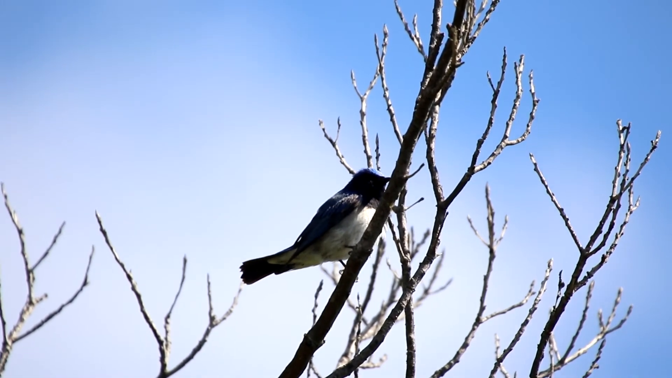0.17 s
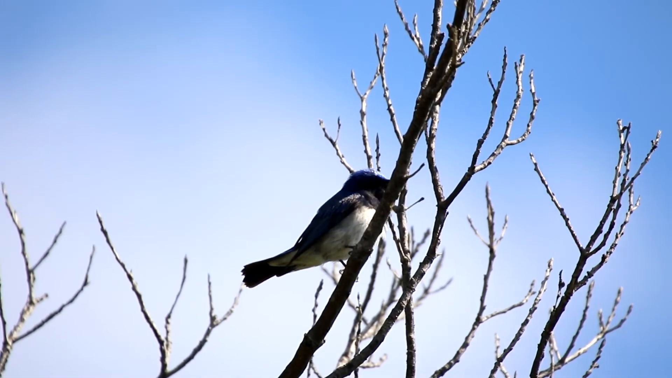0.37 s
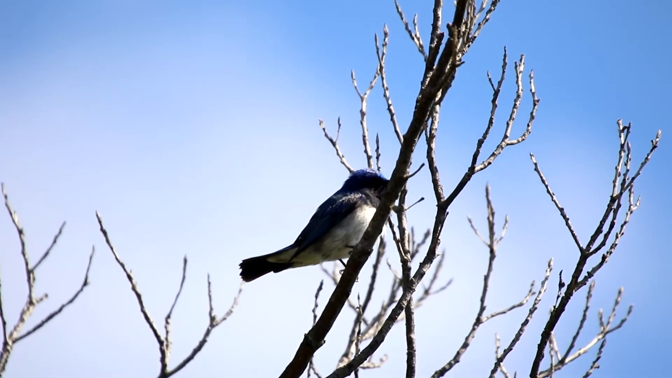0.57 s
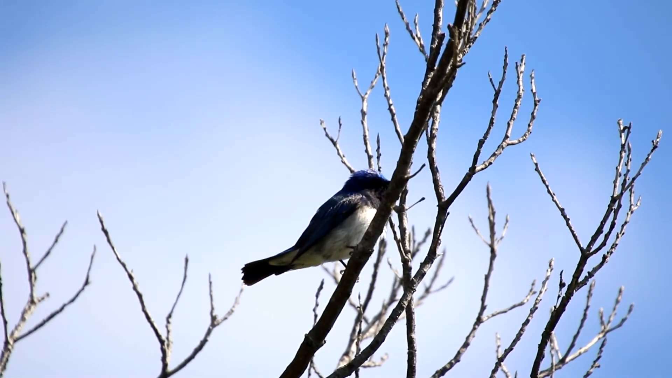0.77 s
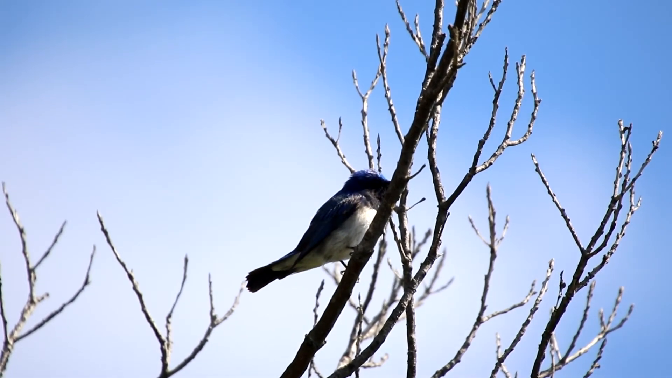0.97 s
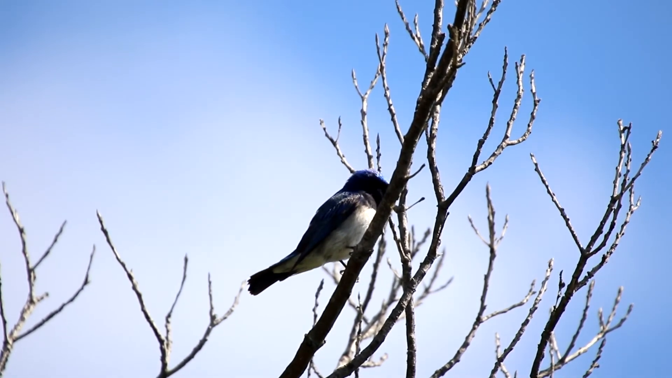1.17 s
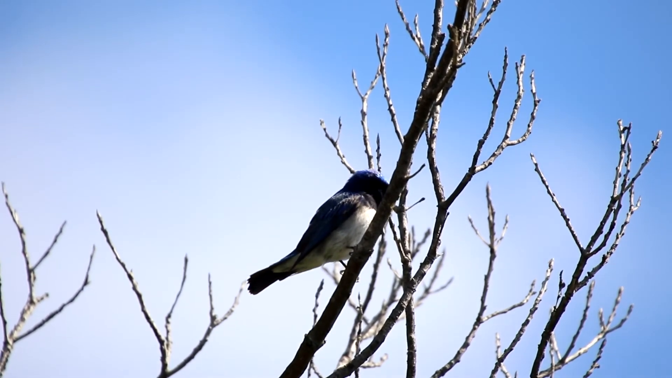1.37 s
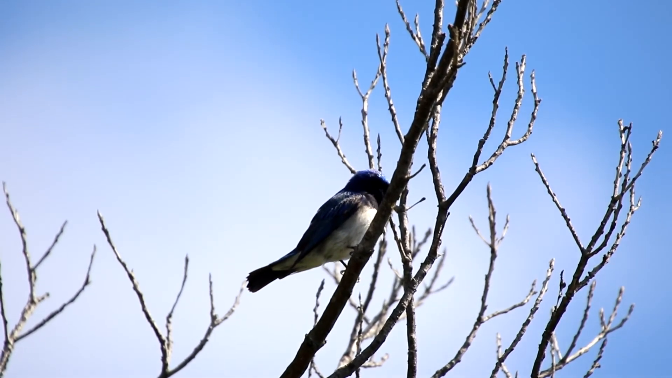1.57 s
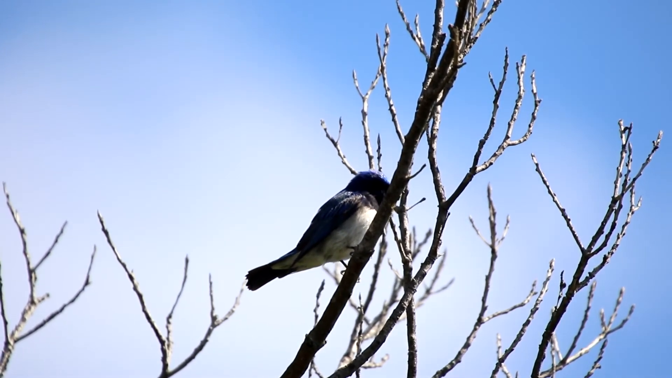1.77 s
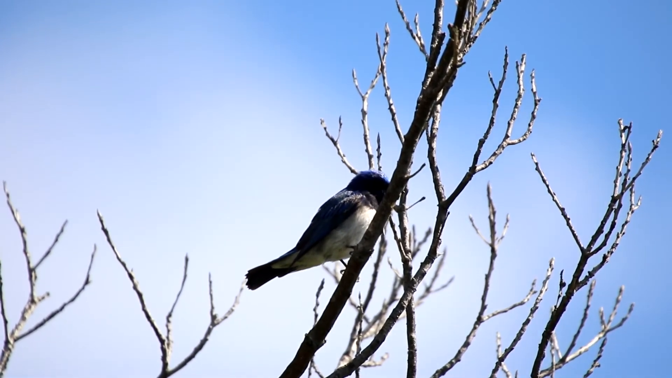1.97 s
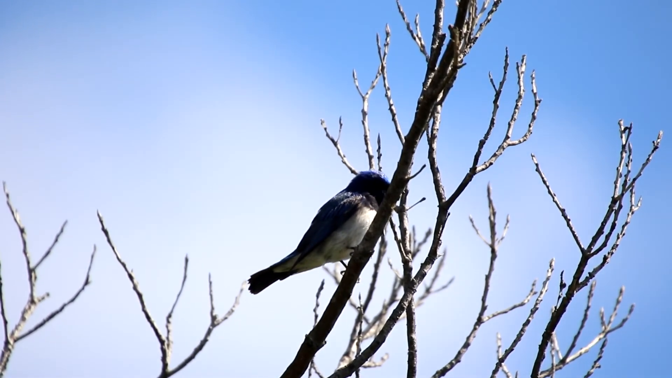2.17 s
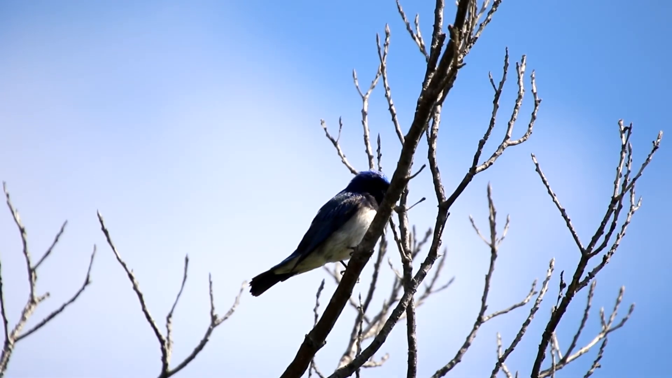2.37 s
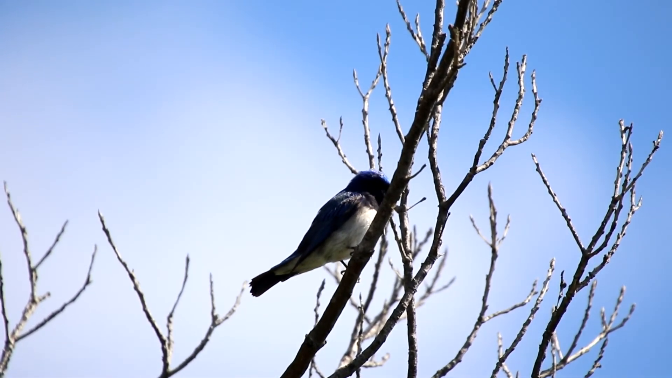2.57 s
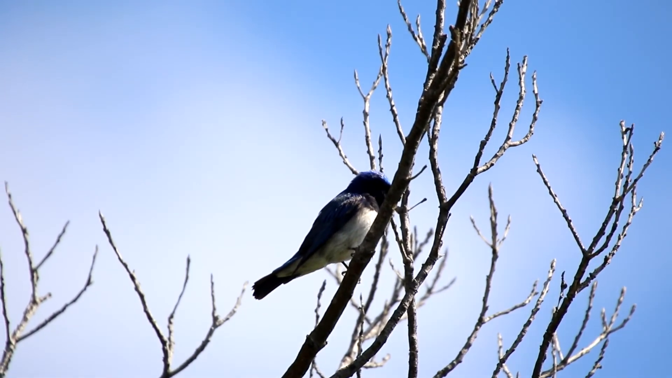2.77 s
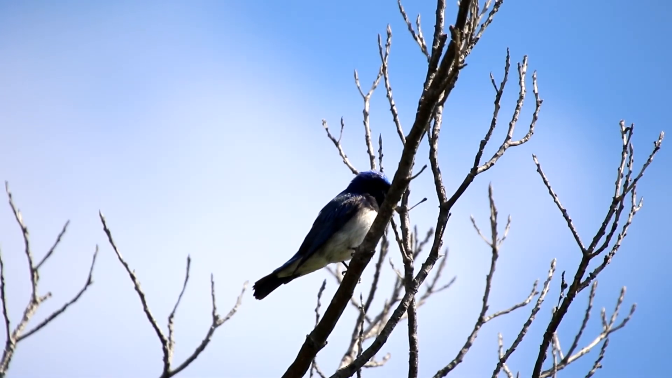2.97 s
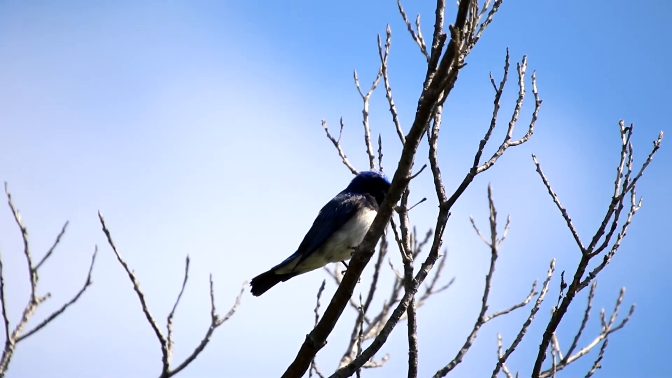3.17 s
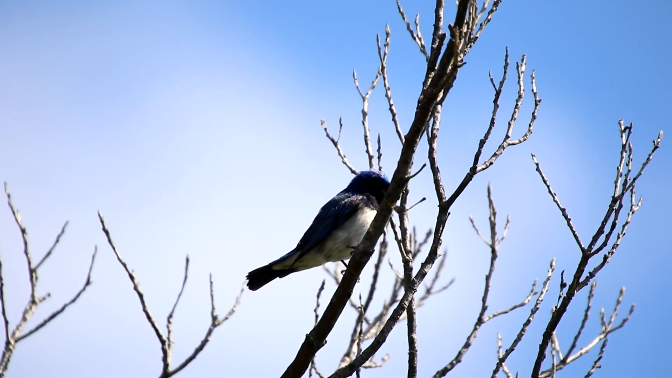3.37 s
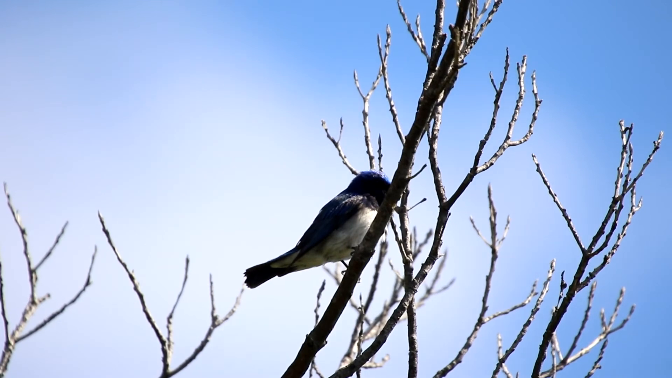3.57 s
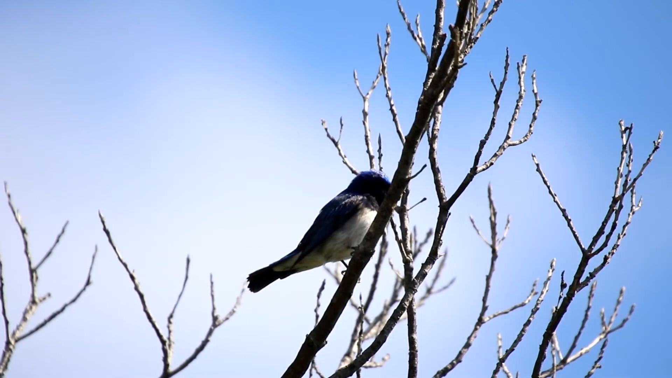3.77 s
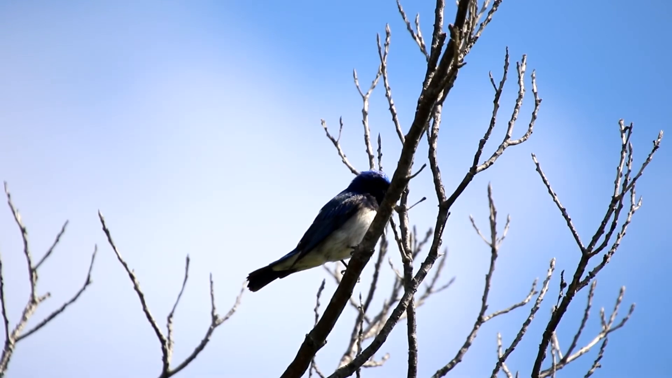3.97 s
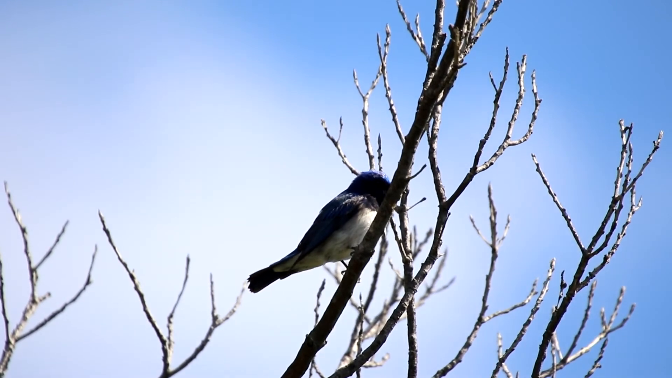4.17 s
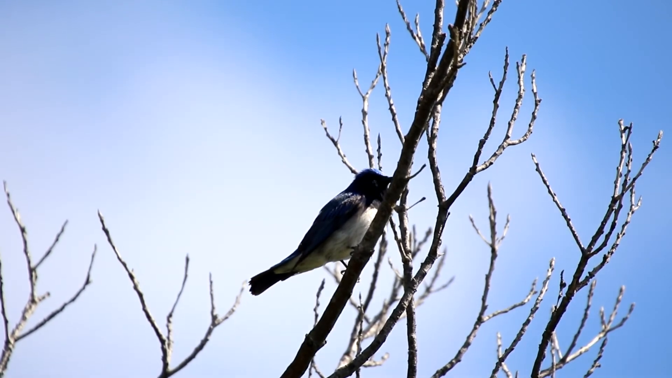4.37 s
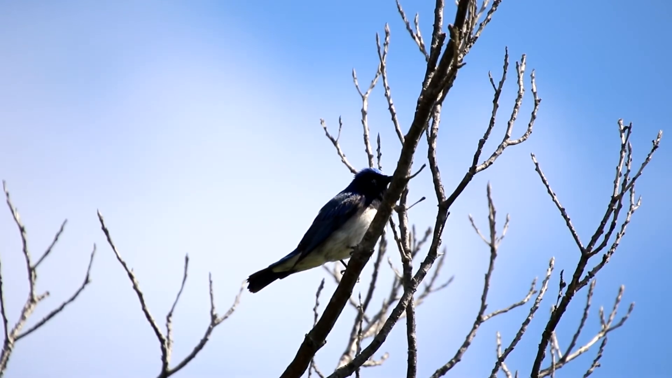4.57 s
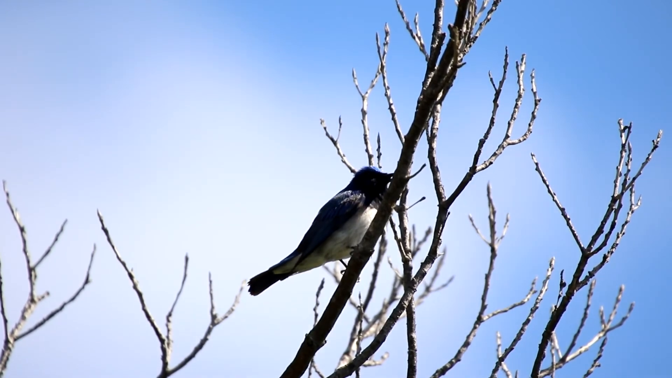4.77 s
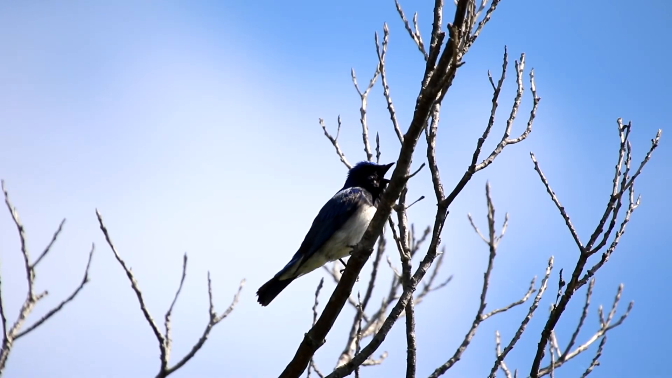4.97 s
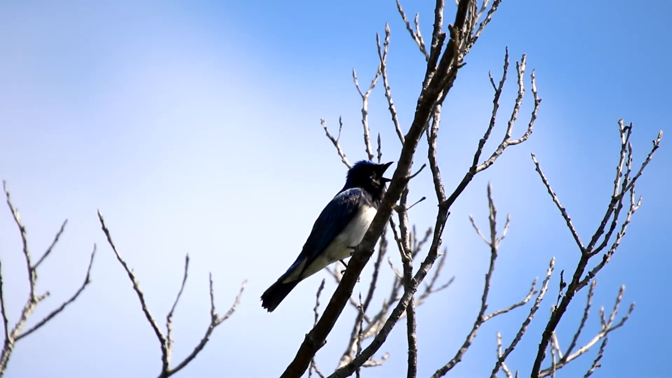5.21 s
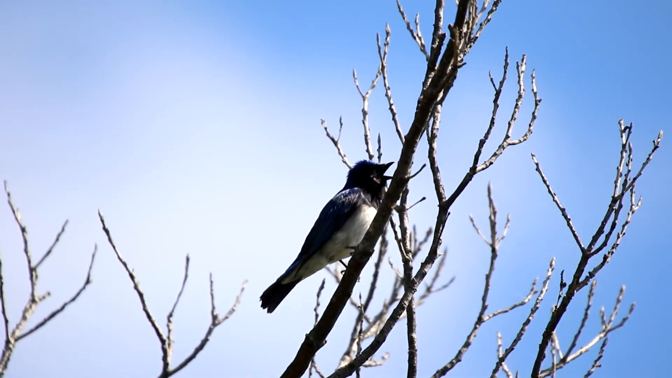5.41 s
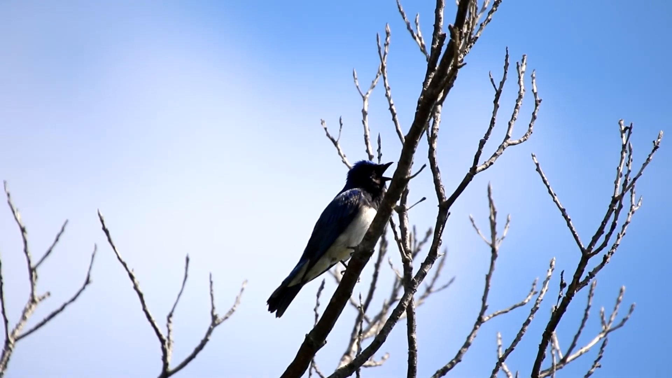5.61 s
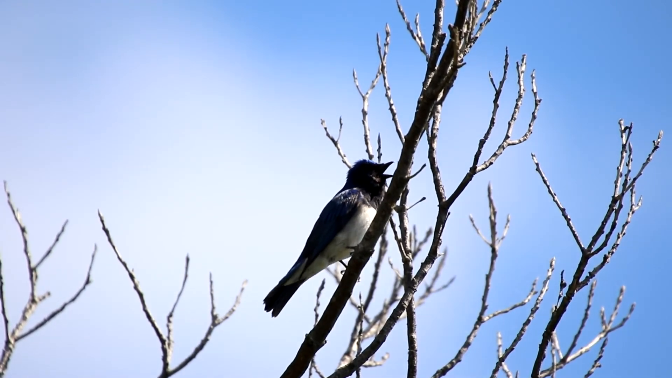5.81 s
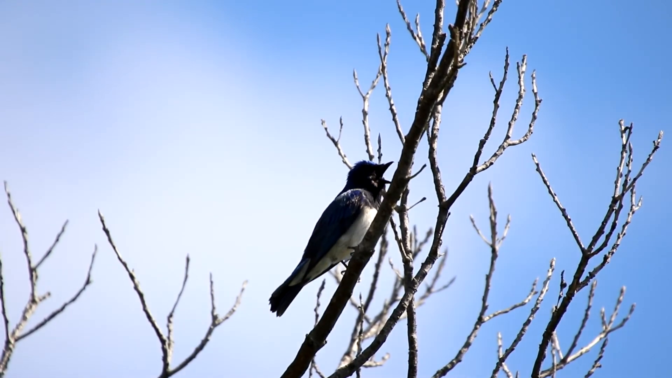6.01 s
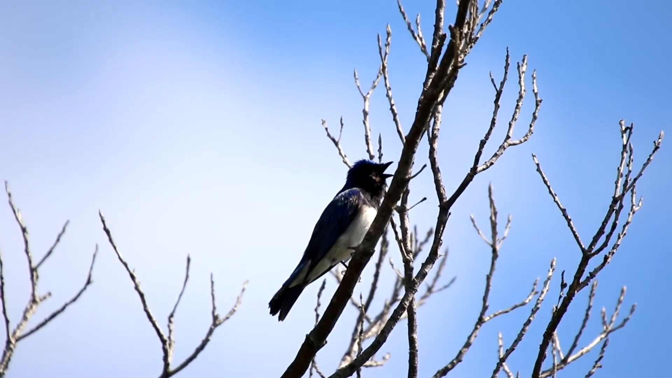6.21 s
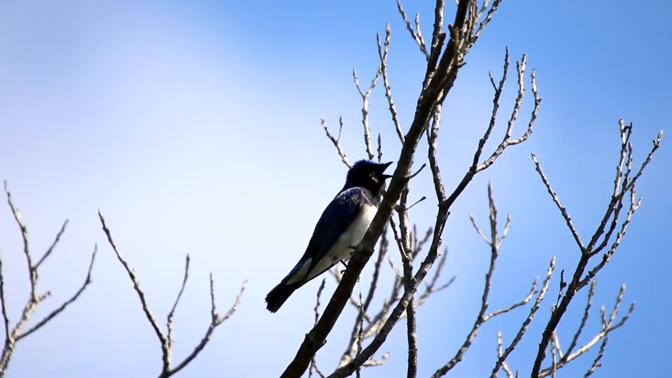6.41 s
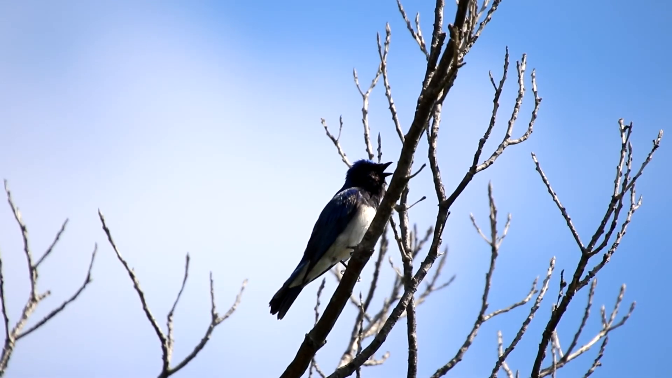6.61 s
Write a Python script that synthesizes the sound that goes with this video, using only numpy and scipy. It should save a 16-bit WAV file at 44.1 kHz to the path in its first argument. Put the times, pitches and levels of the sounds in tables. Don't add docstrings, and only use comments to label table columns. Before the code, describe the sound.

An open outdoor place with low valley roar, soft wash, faint hiss and a distant motor hum around 255 Hz that swells until about 5 s, with a very faint wavering whine. Dull grip rumble and soft bumps occur at 0.25-0.45 s. Faint stray whistles and thin rising chirps from far birds recur from the start, blurred by echo, clearest near 2.9 s. Close plastic ticks cluster at 2.0-2.65 s with a light finger rustle; a few more come at 3.7-4.05 s. From 4.5 s a distant row of pips, each falling, gradually slows until 6.2 s. At 5.0 s the near bird sings, much louder: quick high trill, rising whistle at 5.24, two falling notes at 5.5 and 5.7, then fluttering warbles from 5.9, 6.27 and 6.63 s; the first two end in sharp upward whips, the last begins as the sound stops.

```python
import sys
import numpy as np
from scipy import signal
from scipy.fft import rfft, irfft
from scipy.io import wavfile
from scipy.ndimage import uniform_filter1d

SR = 44100
rng = np.random.default_rng(int(sys.argv[2]) if len(sys.argv) > 2 else 0)


def how_loud(loudness_db):
    steps = np.asarray(loudness_db, float) / 20
    return 10 ** steps


def master_out(mix):
    frames = np.transpose(np.atleast_2d(mix))
    ceiling = np.clip(frames, -1, 1)
    pcm = np.round(ceiling * 32767).astype(np.int16)
    wavfile.write(sys.argv[1], SR, pcm)


N = 293265

# time_s, pitch_hz, level_db
SONG_NOTES = [
    [(4.988, 4100, -41.5), (4.996, 4550, -31), (5.012, 4500, -24), (5.021, 4300, -27), (5.041, 4763, -22.5)],
    [(5.228, 3850, -48), (5.237, 4280, -32)],
    [(5.238, 4080, -49), (5.243, 3470, -22.5), (5.278, 3545, -18), (5.31, 3848, -20.5), (5.358, 4078, -17),
     (5.392, 4030, -24.5)],
]
# start_s, length_s, top_hz, level_db
TRILL_STROKES = [(5.049, .021, 4770, -20), (5.076, 0.021, 4940, -18.5), (5.104, .024, 4830, -18.1),
                 (5.133, .024, 4766, -20), (5.168, 0.0079, 4400, -39.5)]
# length_share, pitch_ratio, level_db
STROKE_SHAPE = [(0, .78, -15), (.13, .88, -4), (.55, .94, -0.9), (.87, .995, -1), (1, 0.96, -6.5)]
# start_s, length_s, rest_hz, level_db, end_change_db
FALLING_NOTES = [
    (5.515, .166, 3505, -20, 2),
    (5.698, .086, 3592, -17.5, -6.5),
]
# start_s, last_low_s, rest_hz, entry_above_rest_hz, whip_top_hz
WARBLED_NOTES = [
    (5.894, 6.099, 3320, 800, 5850),
    (6.268, 6.461, 3240, 1500, 5080),
    (6.633, 6.83, 3280, 1450, 5080),
]
# time_s, entry_share, level_db
WARBLE_ENTRY = [(0, 1, -29), (.007, .66, -23), (.0105, .27, -7), (.022, .11, -3.5), (.039, .01, -.5)]
# after_last_low_s, above_rest_hz, level_db
WARBLE_BEND = [(.015, 270, -2.5), (.032, 471.5, -4), (.044, 821, 0.8)]
# overtone_hz, re_fundamental_db
SECOND_HARMONIC = [(6500, -33.5), (7000, -38.5), (7400, -34), (8000, -37.5), (9000, -40.5), (11000, -18.5)]
THIRD_HARMONIC = [(9800, -34), (10600, -37), (11300, -26), (12200, -30), (13000, -36.5), (15000, -41.5)]

# t60_s, level_db
NEAR_ECHO = [(.17, -12.5), (.7, -28)]
OVERTONE_ECHO = [(.12, -6)]
STRAY_ECHO = [(.12, -8), (.4, -6.5)]
FAR_ECHO = [(.11, -.6), (.6, -6)]
RUN_ECHO = [(.16, -13.5), (.7, -13)]
TICK_ECHO, RUSTLE_ECHO = [(0.03, -1.7)], [(0.05, 0.63)]

# after_start_s, pitch_hz, level_db
ARCH_PART = [(0, 2650, -11), (.012, 3450, -4), (.035, 3770, 0), (.062, 3990, -1), (.087, 4200, -2)]
DROP_PART = [(.087, 4200, 0), (.095, 3450, -2), (.104, 2600, -10)]
FLICK_PART = [(.092, 5100, -10), (.108, 3650, -3), (.122, 3900, -2), (.143, 5100, -10)]
HOOK_PART = [(.105, 1950, -8), (.138, 2550, -5), (.146, 3700, 0), (.151, 2950, 0), (.163, 2350, -5)]
LOOP_PART = [(0, 3900, -9), (.006, 4600, -3), (.02, 5050, 0), (.032, 5700, -2), (.052, 6400, -3),
             (.078, 6800, -6)]
PLUNGE_PART = [(.074, 6780, -4), (.09, 6550, -3), (.098, 4300, 0), (.108, 3400, -2)]
# start_s, pace, pitch_ratio
ARCH_CALLS = [(1.704, .94, .985), (1.966, .9, .97), (2.59, 1.01, 1.005), (2.874, 1.01, .995),
              (3.49, 1.04, .965), (4.197, 1.05, .955)]
# arch_db, drop_db, flick_db, hook_db
ARCH_LEVELS = [(-52.5, -55, -53, -80), (-53.5, -73, -55.5, -58), (-50.5, -50, -55, -54.5),
               (-44, -45, -50.5, -52), (-50.5, -51, -63, -76), (-59, -54, -80, -82)]
# start_s, pace
LOOP_CALLS = [(1.372, 1.29), (2.255, 1.2), (3.161, 1.03), (4.5, 1.12)]
# buzzy_rise_db, clear_plunge_db
LOOP_LEVELS = [(-60, -59), (-63, -61), (-54.5, -58), (-59, -63.5)]
# start_s, length_s, from_hz, to_hz,
# level_db
STRAY_WHISTLES = [(0.072, .015, 2590, 2970, -53), (0.095, 0.018, 2540, 1570, -48),
                  (.113, 0.025, 1520, 1510, -54), (0.194, 0.023, 2210, 2300, -44),
                  (.218, 0.023, 2300, 2850, -55), (0.239, 0.033, 3520, 2870, -49),
                  (0.35, .033, 3250, 2800, -63), (0.811, 0.023, 3160, 2930, -58),
                  (1.102, 0.071, 3470, 3640, -55.5), (1.173, 0.053, 3520, 2510, -60.5),
                  (1.174, 0.044, 4900, 3700, -65), (1.515, .017, 3680, 3850, -58),
                  (1.529, .03, 2200, 2630, -58), (2.86, .025, 3750, 5400, -64),
                  (3.14, .015, 4160, 3500, -57), (3.257, 0.018, 4300, 2990, -46.5),
                  (3.28, 0.013, 2600, 3280, -51), (3.292, .03, 3500, 4540, -54),
                  (3.324, .016, 2500, 4300, -58), (3.345, 0.0089, 3100, 2540, -50.5),
                  (5.4, 0.039, 1670, 2800, -54), (5.522, 0.025, 3340, 2010, -48),
                  (3.6, 0.022, 4340, 2770, -64), (5.804, 0.025, 3654, 3610, -40)]
# length_share, glide_share, level_db
STRAY_SHAPE = [(0, 0.0087, -4), (.36, 0.42, -1), (1, 0.99, -5)]
PIP_STARTS = [4.491, 4.574, 4.659, 4.74, 4.823, 4.907, 4.993, 5.086, 5.164, 5.255, 5.349, 5.443, 5.534,
              5.644, 5.754, 5.884, 6.003, 6.153]
# time_s, pitch_ratio, level_db
PIP_SHAPE = [(-.006, .99, -22.5), (.003, 1.02, -8.5), (.014, 1.005, -2.5), (.027, .97, -8.5),
             (.04, 0.83, -24.5)]
# time_s, level_db, pitch_hz, fall_width_share
RUN_COURSE = [(4.489, -43, 3400, 0.22), (4.575, -55, 3080, 0.65), (4.83, -49.5, 2980, 0.65),
              (5.05, -42, 2907, .4), (5.5, -33, 2865, 0.83), (6, -42, 2766, 0.97), (6.151, -55, 2830, 1.31)]

# time_s, peak_db, ring_hz, ring_width_hz
TICKS = [(2.017, -26.5, 2300, 1100), (2.02, -34, 1190, 600), (2.131, -37, 6540, 4000),
         (2.291, -41, 2000, 1500), (2.316, -38, 2200, 1400), (2.341, -38, 2000, 1000),
         (2.365, -43, 4200, 900), (2.405, -34.5, 2940, 1200), (2.4222, -27, 1470, 1800),
         (2.51, -36, 2650, 1500), (2.528, -31.5, 795, 700), (2.555, -41, 2530, 1400),
         (2.642, -31.5, 1810, 1800), (3.705, -40, 2500, 2000), (3.842, -44, 1100, 910),
         (4.011, -41, 2800, 1510), (4.041, -28, 3080, 1310), (4.044, -38, 6240, 900)]
# time_s, peak_db, pitch_hz, t60_s
BUMPS = [(.253, -34, 130, 0.039), (0.347, -22.5, 121, 0.061), (.367, -28.5, 141, 0.072),
         (0.417, -30, 91, 0.031), (2.314, -22.5, 393, 0.018)]
# time_s, level_db
RUSTLE_LEVEL = [(2.26, -71), (2.3, -56), (2.37, -51.5), (2.39, -56.5), (2.42, -52), (2.47, -58.5),
                (2.56, -61.5), (2.66, -76)]
# freq_hz, level_db
RUSTLE_SPECTRUM = [(300, -24), (900, 6.5), (2500, -1.5), (4500, -7.5), (9000, -19.5), (15000, -26.5)]
# time_s, level_db
GRIP_LEVEL = [(0, -55), (.25, -57), (.4, -48.5), (.6, -59), (.9, -59), (1.2, -95.5)]
# freq_hz, level_db
GRIP_SPECTRUM = [(15, -21.5), (35, -3.0), (70, 5), (130, -5.0), (250, -54)]

# time_s, swell_db
MOTOR_SWELL = [(0, 3), (.12, 0.5), (1.2, 0.5), (2.7, 1.5), (4, 4), (5.2, 4.5), (6.65, 3)]
# centre_s, width_s, swell_db
WHINE_SWELLS = [(1.45, 0.66, 11.5), (2.35, 0.22, 7), (3.04, 0.26, 12), (5.4, 0.88, 8.2)]
# freq_hz, level_db
ROAR_SPECTRUM = [(15, -65), (25, -26.5), (135, -7), (167, -11), (203, -7), (221, -13.5), (237, -7),
                 (251, -8), (319, -9.5), (500, -9), (720, -15), (940, -36), (1580, -120)]
WASH_SPECTRUM = [(420, -31), (720, -3.5), (962, -2.5), (1170, -5.5), (1890, -14), (2060, -15.5),
                 (2600, -20.5), (3380, -40), (5720, -120)]
HISS_SPECTRUM = [(880, -29), (1500, -17.5), (2840, -7.5), (3100, -7.5), (3740, -8), (5070, -12.5),
                 (5640, -11.5), (9780, -12), (15700, -20)]


def curve(points, hz):
    freq_hz, level_db = np.transpose(points)
    return np.interp(np.log(np.maximum(hz, 1)), np.log(freq_hz), level_db)


def unit(x):
    return x / np.sqrt(np.mean(x ** 2))


def shaped(x, points, low_hz=1):
    hz = np.arange(N // 2 + 1) * SR / N
    return unit(irfft(rfft(x) * how_loud(curve(points, hz)) * (hz > low_hz), N))


def noise(points, low_hz=1):
    return shaped(rng.standard_normal(N), points, low_hz)


def walk(rate_hz):
    size = int(SR / rate_hz)
    smooth = uniform_filter1d(rng.standard_normal(N), size)
    return unit(uniform_filter1d(smooth, size))


def sine(hz):
    return np.sin(2 * np.pi * np.cumsum(hz) / SR)


def add_note(hz, gain, rows, edge_s=0.0024):
    time_s, pitch_hz, level_db = np.transpose(rows)
    i = np.arange(int(time_s[0] * SR), min(int(time_s[-1] * SR), N))
    t = i / SR
    hz[i] = np.interp(t, time_s, pitch_hz)
    fade = np.clip(np.minimum(t - time_s[0], time_s[-1] - t) / edge_s, 0, 1)
    gain[i] = how_loud(np.interp(t, time_s, level_db)) * fade


def echoes(x, tails, dry_db=0, send=1):
    t = np.arange(SR) / SR
    response = np.zeros(SR)
    for t60_s, level_db in tails:
        response += how_loud(level_db) * unit(rng.standard_normal(SR) * how_loud(-60 * t / t60_s))
    response *= np.minimum(t / 0.0038, 1) / np.sqrt(SR)
    return how_loud(dry_db) * x + signal.fftconvolve(x * send, response)[:N]


def trill_stroke(start_s, length_s, top_hz, level_db):
    return [(start_s + share * length_s, top_hz * ratio, level_db + db) for share, ratio, db in STROKE_SHAPE]


def falling_note(start_s, length_s, rest_hz, level_db, change_db):
    u = np.arange(0, length_s, 1 / SR)
    snap_hz = 650 * np.exp(-u / 0.005)
    settle_hz = 700 * np.exp(-u / (0.29 * length_s))
    attack_db = -23.5 * np.exp(-u / (0.062 * length_s))
    db = level_db + attack_db + change_db * u / length_s
    return np.transpose([start_s + u, rest_hz + snap_hz + settle_hz, db])


def warbled_note(start_s, last_s, rest_hz, entry_hz, top_hz):
    level_db, sag_hz_per_s = -18.5, 200
    whip_hz_per_s, whip_db_per_khz2 = 195000, -8.5
    close_s, close_db = 0.059, -33
    rows = []
    for s, share, db in WARBLE_ENTRY:
        sag_hz = sag_hz_per_s * (last_s - start_s - s)
        rows.append((start_s + s, rest_hz + share * entry_hz + sag_hz, db))
    rows.append((last_s, rest_hz, 0))
    rows += [(last_s + s, rest_hz + hz, db) for s, hz, db in WARBLE_BEND]
    bend_s, bend_hz, bend_db = rows[-1]
    climb_hz = top_hz - bend_hz
    top_s = bend_s + climb_hz / whip_hz_per_s
    rows.append((top_s, top_hz, bend_db + whip_db_per_khz2 * (climb_hz / 1000) ** 2))
    rows.append((max(last_s + close_s, top_s + 0.001), top_hz, close_db))
    return np.array(rows) + [0, 0, level_db]


def warble(hz, gain):
    period_s, pull_share = 0.0293, 0.58
    swing_hz, last_swing_hz = 356, 241
    snap_dip_db, snap_dip_s = -4.5, 0.0025
    t, pull = np.arange(N) / SR, np.zeros(N)
    swing_scatter, beat_scatter = 1 + 0.1 * walk(35), 0.02 * walk(25)
    for start_s, last_s, *_ in WARBLED_NOTES:
        on = (t > start_s) & (t < last_s)
        cycles = (t - last_s) / period_s
        cycles = cycles + beat_scatter * np.clip(-cycles, 0, 1)
        shape = on * np.interp(cycles % 1, [0, pull_share, 1], [0, 1, 0])
        hz = hz + np.interp(cycles, [-2, -1], [swing_hz, last_swing_hz]) * swing_scatter * shape
        pull += shape
        from_snap_s = (cycles % 1 - (1 + pull_share) / 2) * period_s
        gain = gain * how_loud(on * snap_dip_db * np.exp(-(from_snap_s / snap_dip_s) ** 2))
    return hz, gain, pull


def flycatcher():
    wobble_db, wobble_hz = 1.3, 16
    notch_hz, notch_width_hz, notch_db = 3640, 35, -3
    scatter_db_per_khz = 3
    notes = SONG_NOTES + [trill_stroke(*row) for row in TRILL_STROKES]
    notes += [falling_note(*row) for row in FALLING_NOTES]
    notes += [warbled_note(*row) for row in WARBLED_NOTES]
    hz, gain = np.zeros((2, N))
    for rows in notes:
        add_note(hz, gain, rows)
    t = np.arange(N) / SR
    hz = np.interp(t, t[hz > 0], hz[hz > 0])
    hz, gain, pull = warble(hz, gain)
    hz = uniform_filter1d(hz, size=66)
    dip_db = notch_db * np.exp(-((hz - notch_hz) / notch_width_hz) ** 2)
    gain = np.sqrt(2) * gain * how_loud(wobble_db * walk(230) + dip_db)
    hz = hz + wobble_hz * walk(300)
    phase = 2 * np.pi * np.cumsum(hz) / SR
    second_db = curve(SECOND_HARMONIC, 2 * hz) - 9.4 * pull + 2.6 * walk(120)
    third_db = curve(THIRD_HARMONIC, 3 * hz) + 1.5 * walk(120)
    overtones = how_loud(second_db) * np.sin(2 * phase) + how_loud(third_db) * np.sin(3 * phase)
    overtones += how_loud(-54.5) * np.sin(4 * phase) * (4 * hz < SR / 2.5)
    send = how_loud(scatter_db_per_khz * (hz - 3600) / 1000)
    fundamental = echoes(gain * np.sin(phase), NEAR_ECHO, send=send)
    return fundamental + echoes(gain * overtones, OVERTONE_ECHO)


def whistle(notes, rough_hz):
    out, tremble_hz = np.zeros(N), rough_hz * walk(600)
    for rows in notes:
        hz, gain = np.zeros((2, N))
        add_note(hz, gain, rows, edge_s=0.0021)
        i = np.flatnonzero(hz)
        out[i] += np.sqrt(2) * gain[i] * sine(hz[i] + tremble_hz[i])
    return out


def call_part(part, start_s, pace, ratio, level_db):
    return [(start_s + pace * s, ratio * hz, level_db + db) for s, hz, db in part]


def far_callers():
    clear, flicks, loops, low = [], [], [], []
    for call, (arch_db, drop_db, flick_db, hook_db) in zip(ARCH_CALLS, ARCH_LEVELS):
        clear.append(call_part(ARCH_PART, *call, arch_db))
        clear.append(call_part(DROP_PART, *call, drop_db))
        flicks.append(call_part(FLICK_PART, *call, flick_db))
        low.append(call_part(HOOK_PART, *call, hook_db))
    for (start_s, pace), (rise_db, plunge_db) in zip(LOOP_CALLS, LOOP_LEVELS):
        loops.append(call_part(LOOP_PART, start_s, pace, 1, rise_db))
        clear.append(call_part(PLUNGE_PART, start_s, pace, 1, plunge_db))
    for start_s, length_s, from_hz, to_hz, level_db in STRAY_WHISTLES:
        low.append([(start_s + share * length_s, from_hz + way * (to_hz - from_hz), level_db + db)
                    for share, way, db in STRAY_SHAPE])
    out = echoes(whistle(clear, rough_hz=16), FAR_ECHO)
    out += echoes(whistle(loops, rough_hz=230), FAR_ECHO, dry_db=-3)
    out += echoes(whistle(flicks, rough_hz=70), FAR_ECHO, dry_db=-3)
    return out + echoes(whistle(low, rough_hz=30), STRAY_ECHO)


def pip_run():
    time_s, *columns = np.transpose(RUN_COURSE)
    levels_db, pitches_hz, widths = (np.interp(PIP_STARTS, time_s, column) for column in columns)
    pips = []
    for start_s, level_db, pitch_hz, width in zip(PIP_STARTS, levels_db, pitches_hz, widths):
        pips.append([(start_s + s, pitch_hz * ratio ** width, level_db + db) for s, ratio, db in PIP_SHAPE])
    return echoes(whistle(pips, rough_hz=5.3), RUN_ECHO)


def camera_knocks():
    out, t = np.zeros(N + SR), np.arange(SR // 8) / SR
    for time_s, peak_db, ring_hz, width_hz in TICKS:
        fade = np.pi * width_hz * t
        ring = np.e * fade * np.exp(-fade) * np.sin(2 * np.pi * ring_hz * t)
        out[int(time_s * SR):][:len(t)] += how_loud(peak_db) * ring
    for time_s, peak_db, pitch_hz, t60_s in BUMPS:
        envelope = how_loud(peak_db - 60 * t / t60_s) * np.minimum(t / 0.0016, 1)
        out[int(time_s * SR):][:len(t)] += envelope * np.sin(2 * np.pi * pitch_hz * t)
    return echoes(out[:N], TICK_ECHO)


def finger_rustle():
    grains_per_s = 800
    hits = rng.random(N) < grains_per_s / SR
    grains = hits * how_loud(2.2 * rng.exponential(size=N)) * rng.standard_normal(N)
    level_db = np.interp(np.arange(N) / SR, *np.transpose(RUSTLE_LEVEL), left=-140, right=-140)
    return echoes(shaped(grains, RUSTLE_SPECTRUM) * how_loud(level_db), RUSTLE_ECHO)


def grip_rumble():
    level_db = np.interp(np.arange(N) / SR, *np.transpose(GRIP_LEVEL))
    return how_loud(level_db + 3.5 * walk(26)) * noise(GRIP_SPECTRUM)


def motor():
    t = np.arange(N) / SR
    swell_db = np.interp(t, *np.transpose(MOTOR_SWELL))
    hum_db = -51.5 + 1.29 * swell_db - 9 * np.clip(1 - t / 0.67, 0, 1)
    hum = how_loud(hum_db + 0.62 * walk(9.2) + 3.9 * walk(19)) * sine(255.3 + 2.763 * walk(3.15))
    whine_db = -72 + 3.0 * walk(24)
    for centre_s, width_s, db in WHINE_SWELLS:
        whine_db += db * np.exp(-((t - centre_s) / width_s) ** 2)
    return hum + how_loud(whine_db) * sine(1810 + 7 * walk(8))


def valley():
    swell_db = np.interp(np.arange(N) / SR, *np.transpose(MOTOR_SWELL))
    roar = how_loud(-48.5 + swell_db + 0.27 * walk(4.3)) * noise(ROAR_SPECTRUM)
    return roar + how_loud(-51.5 + 0.5 * walk(5.6)) * noise(WASH_SPECTRUM)


def hiss():
    return how_loud(-61) * noise(HISS_SPECTRUM, low_hz=2300)


def scene():
    birds = flycatcher() + far_callers() + pip_run()
    handling = camera_knocks() + finger_rustle() + grip_rumble()
    return (birds + handling + motor() + valley() + hiss())[None]


def low_pass(x):
    return signal.sosfilt(signal.butter(12, 15810, fs=SR, output="sos"), x)


def record(dry):
    return low_pass(dry)


dry = scene()
out = record(dry)
master_out(out)
```